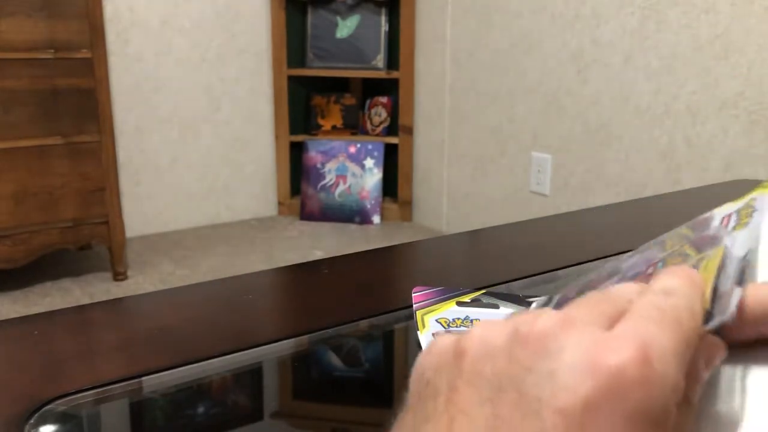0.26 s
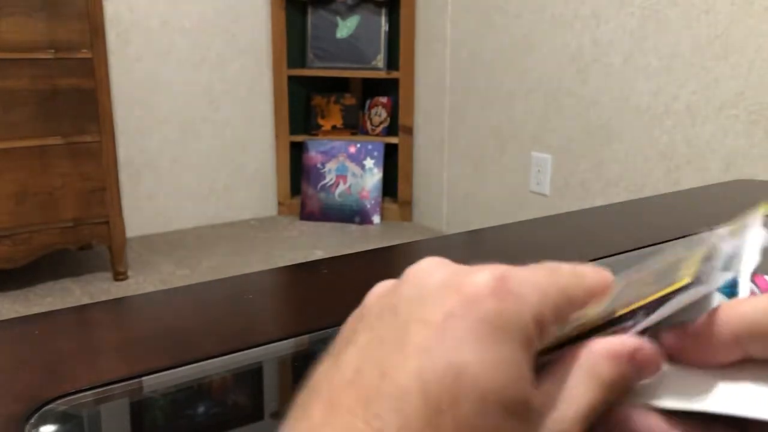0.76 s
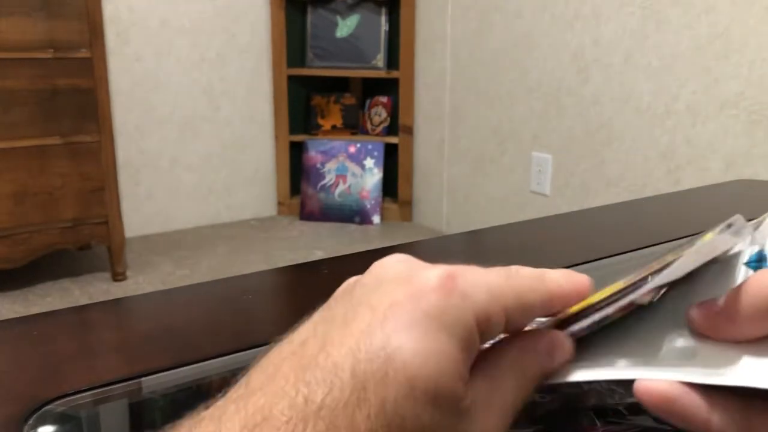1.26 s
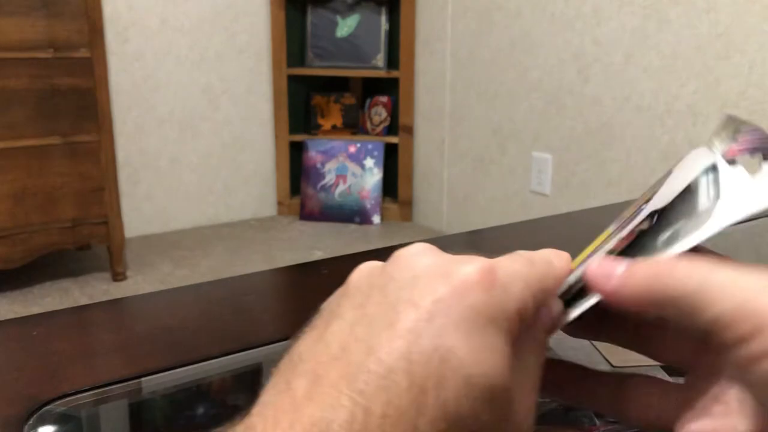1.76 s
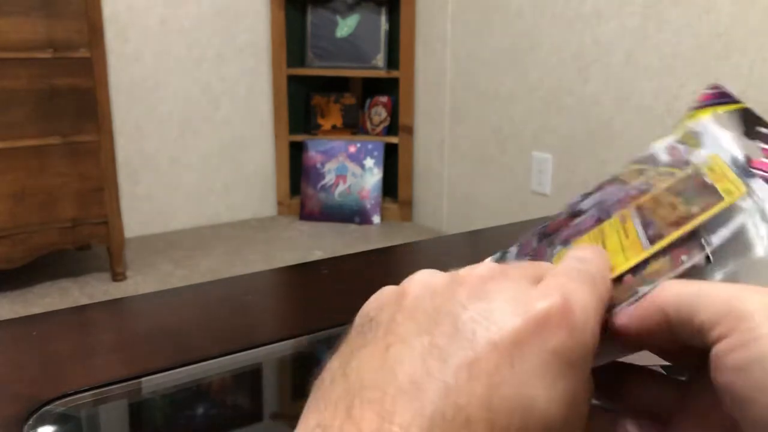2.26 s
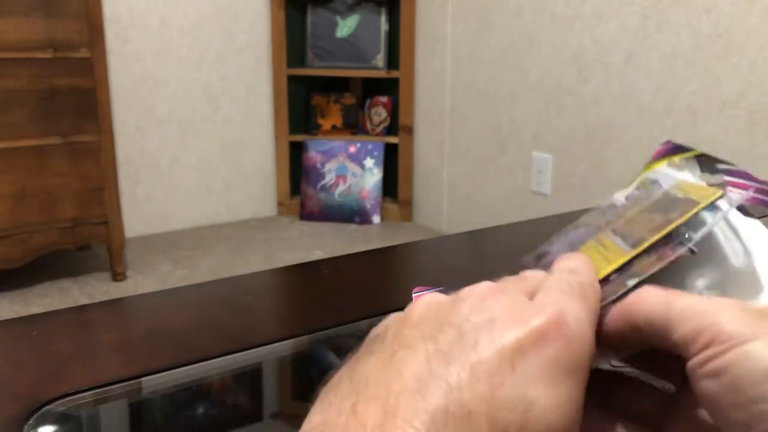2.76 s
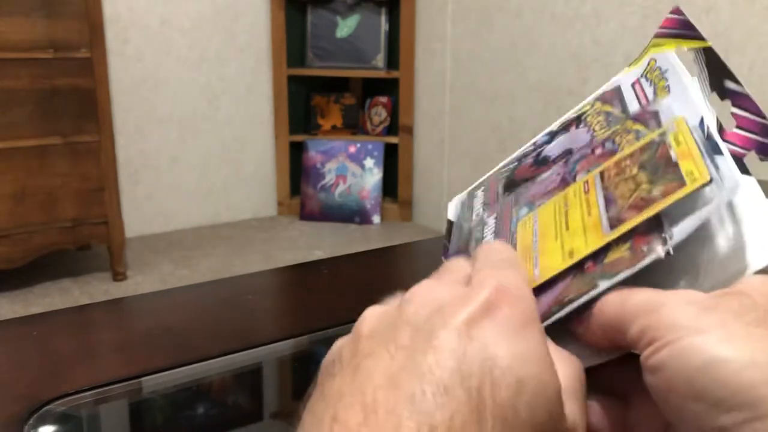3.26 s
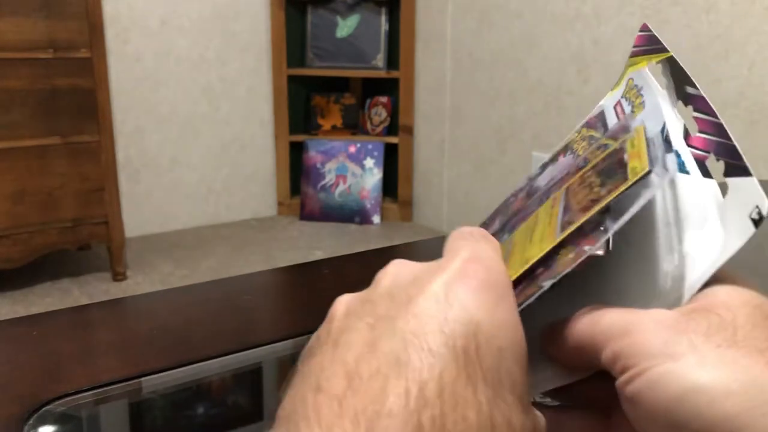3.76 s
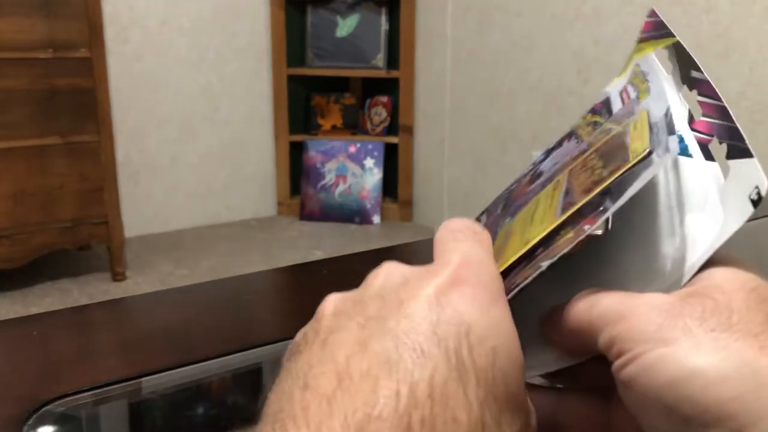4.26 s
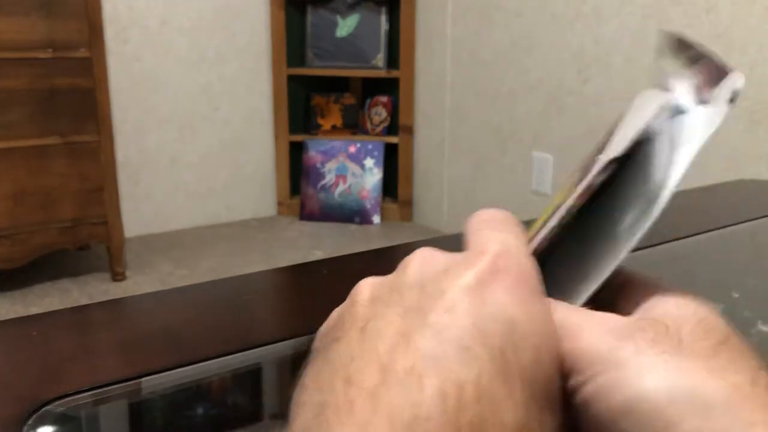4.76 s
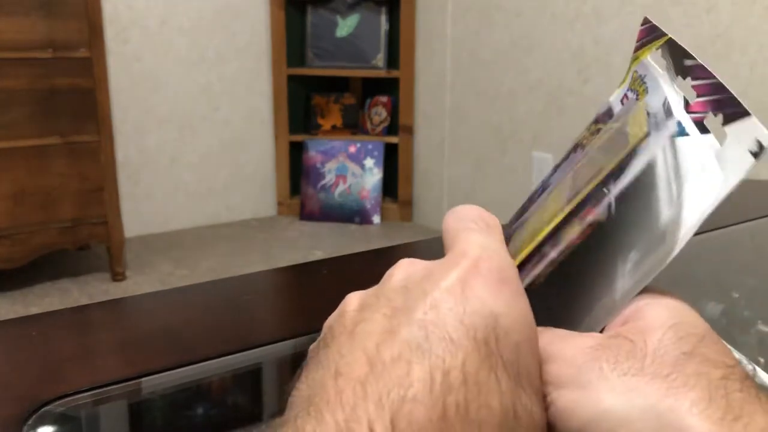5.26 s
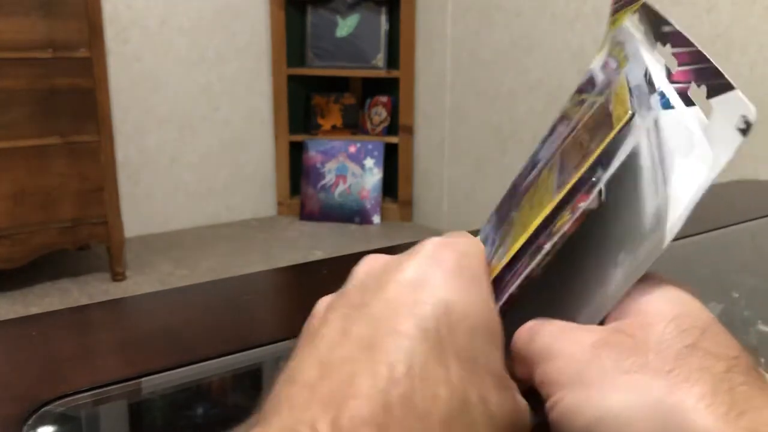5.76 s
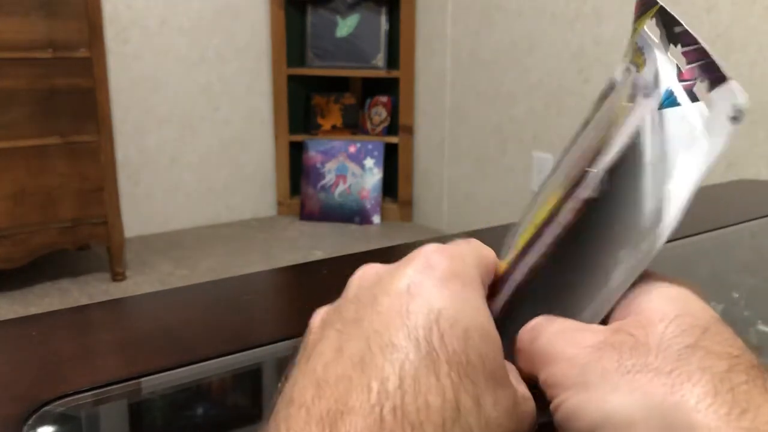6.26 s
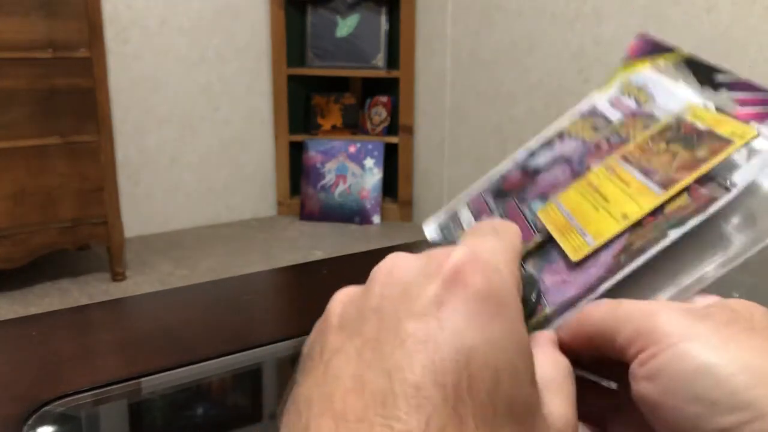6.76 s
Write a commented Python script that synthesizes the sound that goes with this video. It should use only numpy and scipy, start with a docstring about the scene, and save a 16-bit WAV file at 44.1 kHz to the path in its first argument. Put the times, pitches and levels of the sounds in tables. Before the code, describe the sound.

Close to a phone microphone in a carpeted room, hands pull stiff plastic from cardboard. Between 0.1 and 0.2 s, several loud, bright snaps ring out over a short scraping rustle. Soft strokes and dull card cracks follow; at 0.8 s a very sharp snap comes with a hollow, briefly ringing pop. From 1 to 2.5 s it is quieter: brief hissing slides, small ticks, woody cracks and near pauses. At 2.6-2.85 s the board cracks again, then a dense crackling run at 3.0-3.12 s and a dull thud near 3.17 s. From 3.2 s fizzy, uneven tearing grows longer among snaps, strongest around 4.9-5.05 s with crowded cracks. Snaps and short rips continue to about 6.4 s, with faint squeaky rubs. Tiny creaks and soft crinkling end near 7 s, over a low steady rumble.

```python
"""Two hands pull a stiff plastic blister off its cardboard backing, close to a phone in a carpeted room.
It starts with sharp shell snaps, each a burst spread by bending waves, and soon a dome pops: a ringing band.
Strokes hiss as coloured noise, some with a fizz of tiny random fibre breaks; lower cracks crowd near 3 s.
From 3.2 s the tearing is longer and stronger, among more snaps; late creaks repeat a slip.
Faint singing rubs come and go; rustling hands, reflections and a low steady rumble lie behind."""
import sys
import numpy as np
from scipy import signal
from scipy.fft import rfft, irfft, next_fast_len
from scipy.io import wavfile
from scipy.ndimage import uniform_filter1d

SR = 44100
rng = np.random.default_rng(int(sys.argv[2]) if len(sys.argv) > 2 else 0)


def dump_mix(stems):
    """Bounce the given channels to the path in sys.argv[1] as a 16-bit WAV at rate SR."""
    frames = np.atleast_2d(stems).T  # one column per channel
    limited = np.clip(frames, -1, 1)  # hard clip at full scale
    pcm = np.round(limited * 32767).astype(np.int16)
    wavfile.write(sys.argv[1], SR, pcm)


N = 308700
TIME = np.arange(N) / SR
LEAD_SAMPLES = 256  # a snap starts this long before its peak

# Levels in the tables are those of each source before it is shaped and mixed.
# Short sounds: the level is that of the same energy spread over one millisecond.
# the shell buckles: start_s, shell level_db, treble_db and board_db relative to the shell, pitch_hz
SNAPS = [(0.1118, -20.5, -20, -31, 4220), (0.1214, -20.5, -13, -15, 4500), (0.1797, -13.5, -4, -13.5, 6020),
         (0.2122, -18, -8.5, -7.5, 4320), (0.798, -21, -6, -18, 5000), (0.8054, -13, -9, -17.5, 4010),
         (1.2562, -34, -17, -7.5, 3860), (1.5809, -36, -8.5, -2.5, 3360), (2.4666, -35.5, -3, -1, 7000),
         (3.3952, -29.5, 6, -11, 3840), (3.609, -29, -3, -10, 6800), (3.9876, -31.0, -6, 0.5, 6250),
         (4.17, -28.5, 5, -5, 4000), (4.2574, -29.5, 6, -10.5, 6400), (4.321, -38, -3.5, -31, 3960),
         (4.4513, -29, -2, -9, 3950), (4.6495, -33.5, 12, -3.5, 7000), (4.679, -26.5, -15, -9, 3330),
         (4.9707, -31, 5, -7, 5870), (5.0088, -29, -2, -24, 4230), (5.0204, -26, -10, -11, 4340),
         (5.1503, -31, -6, -15, 5500), (5.3, -27, -10, -1, 4200), (5.3972, -29, -20, -3, 4240),
         (5.432, -32.5, -14, -4, 4370), (5.691, -34, -4, -2, 4280), (5.7768, -31, -15, -5, 3100),
         (5.8832, -29, -11, -8, 5200), (5.9029, -24.5, 2, -15, 3150), (5.912, -29.5, -24, -9, 4650),
         (6.0538, -29, -18, -5.5, 4800), (6.18, -29, -3, -12, 2550), (6.3725, -37.5, -7, -5, 3140),
         (6.9942, -39, -21, -7, 4870)]
# small creases flip: start_s, shell level_db
TICKS = [(1.0438, -37.5), (1.378, -39), (1.4347, -40), (1.4601, -34.5), (2.601, -38), (2.6596, -37.5),
         (2.929, -47.5), (3.783, -45), (4.093, -39.5), (4.351, -38), (4.377, -40), (4.567, -39),
         (4.808, -43.5), (5.292, -34.5), (5.411, -35.5), (5.968, -40), (6.382, -42.5)]
# the dome of the blister pops through: start_s, level_db, low and high edge of its band_hz
POP_S, POP_DB, DOME_HZ = .8057, -22, (1710, 2300)
# single strong fibres part: start_s, level_db
FIBRE_SNAPS = [(1.6226, -43), (2.298, -41), (3.419, -25), (4.0342, -34), (4.4616, -30.5), (4.8958, -30),
               (4.9295, -30), (5.576, -33), (5.6589, -35), (5.8028, -30.5), (5.957, -35.5), (6.1474, -39)]
# the cardboard cracks, dull and woody: start_s, level_db, pitch_hz
CRACKS = [(0.027, -34.5, 1550), (0.3593, -33.5, 1030), (0.4145, -42, 1600), (0.58, -45.5, 1220),
          (0.746, -42.5, 1500), (0.931, -37, 1070), (1.3486, -43.5, 1200), (1.362, -35.5, 990),
          (1.39, -50, 1150), (1.637, -32.5, 900), (2.597, -35.5, 1640), (2.6199, -32.5, 1770),
          (2.72, -43.5, 2280), (2.756, -33.5, 1800), (2.7681, -31, 1900), (2.774, -32, 1480),
          (2.8464, -31, 1190), (2.978, -36, 1320), (2.99, -39, 1100), (3.023, -33.5, 1400),
          (3.032, -37, 920), (3.055, -34, 1060), (3.0711, -33.5, 1550), (3.0874, -34, 1050),
          (3.099, -30.5, 1000), (3.107, -34, 774), (3.1235, -30.5, 2020), (3.7085, -34.5, 1290),
          (3.813, -30, 1330), (3.841, -40, 1090), (3.857, -41, 1050), (3.8896, -30.5, 1470),
          (4.023, -34, 1430), (4.4025, -32, 1840), (4.619, -36.5, 1400), (4.6394, -33.5, 1370),
          (4.937, -39, 1020), (4.949, -34, 1100), (4.9656, -31, 1010), (4.983, -32, 1640),
          (4.995, -29, 1410), (5.042, -28, 1240), (5.113, -39, 900), (5.7908, -29.5, 1470),
          (6.261, -43, 1400)]
# the whole card flexes against the hands: start_s, level_db
KNOCKS = [(2.598, -38), (2.767, -43), (2.848, -35.5), (3.168, -25.5), (3.84, -34.5), (3.89, -44.5)]
# plastic catches and slips in runs: start_s, end_s, typical slips_per_s, typical level_db of the board
CREAKS = [(5.198, 5.259, 91, -40), (6.655, 6.739, 127, -41), (6.854, 6.897, 84, -44.5)]

# Longer movements.
# strokes of plastic over card: start_s, end_s, level_db, torn_share (power from tearing fibre, 0-1)
STROKES = [(0, 0.212, -52, 0.14), (0.359, 0.508, -54.5, 0.6), (0.584, 0.956, -56, 0.08),
           (1.128, 1.3, -53, 0.27), (1.41, 1.562, -53.5, 0.27), (2.017, 2.053, -55, 0),
           (2.123, 2.227, -56, 0.75), (2.294, 2.406, -57, 0.16), (2.447, 2.5, -49.5, 0),
           (2.572, 2.67, -53, 0), (3.293, 3.366, -48, 0.09), (3.377, 3.505, -48, 0.48),
           (3.601, 3.851, -51, 0.91), (4.323, 4.493, -48.5, 0.8), (4.599, 4.718, -52.5, 0.63),
           (4.885, 5.026, -41, 0.81), (5.058, 5.315, -56.5, 0.67), (5.542, 5.67, -51, 0.65),
           (5.683, 5.728, -41.5, 0.85), (6.068, 6.114, -53.5, 0.74), (6.362, 6.405, -57, 0.54)]
# a steady pull slowly peels the glued seam: start_s, end_s
PEELS = [(3.201, 4.6), (5.2, 5.5)]
PEEL_DB, PEEL_TORN = -59.5, 0.86  # level_db and torn_share of every peel
# the grip shifts and bends the card: start_s, end_s, crackle_db, rumble_db
FLEXES = [(0, 0.155, -57, -78), (1.329, 1.45, -59, -62), (2.315, 2.356, -61, -50.5),
          (2.593, 2.643, -50.5, -48), (2.717, 2.795, -53.5, -51.5), (3.003, 3.193, -54.5, -53),
          (3.988, 4.027, -63, -52), (4.926, 5.066, -56, -56.5), (5.193, 5.329, -60.5, -56.5),
          (5.9, 5.968, -54, -65), (6.397, 6.57, -62, -80), (6.655, 6.737, -67, -51.5),
          (6.77, 6.91, -65, -59.5)]
# fingertips rub the smooth shell: start_s, end_s, voice level_db, centre pitch_hz
RUBS = [(1.785, 1.858, -64, 4510), (1.943, 2.026, -64.5, 1490), (4.12, 4.223, -59, 3860),
        (5.435, 5.518, -53.5, 4660), (6.513, 6.587, -55.5, 4410)]
# the hands lean on the desk: start_s, end_s, level_db
LEANS = [(0.355, .56, -58.5), (1.616, 1.79, -60), (4.64, 4.677, -54.5)]
# the hands are almost still: start_s, end_s
PAUSES = [(.97, 1.11), (1.68, 1.96), (4.76, 4.87)]

# board crackle under a stroke: its level_db at the usual stroke level_db, and its rise in dB per dB
DRAG_DB, USUAL_DB, DRAG_DB_PER_DB = -65.5, -50.5, 0.24
# the more of a stroke is tearing, the finer the fizz: extra top in dB per unit of share, full from FINE_HZ
FINE_HZ, FINE_DB_PER_SHARE = 13000, 14
# fibres of different lengths part at different pitches: edges of their bands, edge_hz
FIBRE_EDGES_HZ = [5000, 7000, 9000, 11500, 14000, 17000]
# resonances of the freed flap: pitch_hz at time FLAP_S, gain_db next to the direct sound
FLAP = [(5330, -2), (6300, -5), (8000, -7), (10100, 0)]
# reference time in s, sinking of the pitch per s (natural log), half width as a share of the pitch
FLAP_S, FLAP_SINK_PER_S, FLAP_WIDTH = 3.9, .062, 0.018
# resonances of the hollow blister: pitch_hz, width_hz, gain_db next to the direct sound
HOLLOW = [(1560, 400, 2.5), (4270, 5170, 3)]

# Spectra, only their shape counts: frequency_hz, relative_db
# plastic sliding on card
SLIDE_COLOUR = [(900, -16), (2000, 1), (3000, -0.5), (4300, 8.5), (6200, 1), (8000, 0.5), (13500, 1.5),
                (15500, -3.5)]
# tearing fibre at an even split of sliding and tearing
TEAR_COLOUR = [(3000, -61), (6000, 4.5), (8000, 5), (10000, 1.5), (13500, 2), (15500, 5)]
# crackling cardboard
BOARD_COLOUR = [(150, -13), (350, -4), (600, -7.5), (1000, -3.5), (1600, -10), (2600, -7.5), (6000, -14.5),
                (16000, -13.5)]
# rumble of the gripped card
GRIP_COLOUR = [(30, -44.5), (80, -3), (120, 3.5), (210, -2), (330, 3.5), (520, -4), (1200, -55)]
# weight of the hands on the desk
LEAN_COLOUR = [(25, -33), (65, -3), (110, -11.5), (300, -29.5), (1200, -84)]
# low steady rumble of the house
AIR_COLOUR = [(20, -62), (45, -16), (65, -8), (110, -10.5), (320, -15.5), (700, -19), (4500, -32),
              (16000, -37.5)]
AIR_DB = -64.5
TOP_HZ = 16100


def snaps():
    """Bright snaps of the shell, each pinging at its own pitch; each begins a little before its peak."""
    out = np.zeros(N)
    for s, db, treble_db, board_db, hz in SNAPS:
        add(out, s - LEAD_SAMPLES / SR, undb(db) * snap(board_db, treble_db, hz))
    return out


def snap(board_db, treble_db, hz, ping_db=0, ping_t60=0.006, thud_db=-14,
         lead_db=-15, lead_s=0.00016, give_db=-20, give_s=.004, size=LEAD_SAMPLES):
    """A crease starts to give, then cracks, pings a patch of the shell and, lower and later, the board."""
    burst = band(release(t60=0.0096, scatter=0.99), 3210, 6500)
    shell = unit(bend(burst, lag_s=0.000362))
    t = TIME[:len(shell)]
    ping = np.sin(2 * np.pi * hz * t) * undb(-60 * t / ping_t60)
    ping = band(ping, hz / 1.5, hz * 1.5)
    shell = unit(shell + undb(ping_db) * unit(ping))
    crack = unit(band(release(t60=0.0044, scatter=14.0), 6460, 14200, order=3))
    wave = bend(release(t60=0.026, scatter=0.78), lag_s=0.00102)
    board = unit(band(wave, 797, 2610)) + undb(thud_db) * unit(band(wave, 393, 610))
    # a first small give, then smaller breaks crowd in just before the main one
    lead = rng.standard_normal(size) * np.exp(-TIME[:size][::-1] / lead_s)
    lead *= undb(lead_db) / np.linalg.norm(lead)
    lead[-min(int(give_s * SR), size)] += undb(give_db)
    lead[-1] = 1
    late_crack = np.pad(crack, (size - 1, 0))  # the treble waits for the main break
    return signal.fftconvolve(shell + undb(board_db) * board, lead) + undb(treble_db) * late_crack


def ticks(board_db=-4, treble_db=-5, pitch_hz=4500):
    """Small creases flip like weak snaps."""
    out = np.zeros(N)
    for s, db in TICKS:
        add(out, s - LEAD_SAMPLES / SR, undb(db) * snap(board_db, treble_db, pitch_hz))
    return out


def pop():
    """The dome flips over with a sharp ping and rattles on briefly."""
    out = np.zeros(N)
    ring = band(release(t60=0.19, scatter=0.26, size=8192), *DOME_HZ, order=3)
    add(out, POP_S, undb(POP_DB) * unit(ring))
    return out


def friction():
    """Sliding hisses, parting fibres fizz and the strained board crackles, all in small fits and starts."""
    breaks = grains(rate=700, spread_db=7)
    # small creases flip one by one and sound in shell and board together
    crinkles = bend(grains(rate=170, spread_db=2.8), lag_s=.001)
    fits = undb(3 * walk(110) + 1.3 * walk(25))
    hiss, fizz, rasp = rng.standard_normal((3, N))
    pings = fibres()
    bending = sum(undb(db) * swell(TIME, a, b) for a, b, db, _ in FLEXES)
    dull = band(crinkles, 300, 3500, order=1)
    out = bending * fits * colour(rasp + 1.9 * dull, BOARD_COLOUR)
    peels = [(a, b, PEEL_DB, PEEL_TORN) for a, b in PEELS]
    for start, end, db, torn in STROKES + peels:
        # work on a short stretch of time around the stroke
        first = max(int((start - .06) * SR), 0)
        length = next_fast_len(int((end - start + .14) * SR), True)
        t = first / SR + TIME[:length]
        span = (first + np.arange(len(t))) % N

        torn = np.clip(torn, .002, .98)
        slide_db, tear_db = db + 10 * np.log10([1 - torn, torn])
        board_db = DRAG_DB + DRAG_DB_PER_DB * (db - USUAL_DB)
        # breaking fibres stand out of the hiss only while the card really tears
        tearing = 1.6 / (1 + np.exp(-(tear_db + 56) / 4))
        # the strained board crinkles faintly as it tears
        strain = .2 * tearing * crinkles[span]

        sliding = hiss[span] + tearing * breaks[span] + strain
        slide = undb(slide_db - 1.5) * colour(sliding, SLIDE_COLOUR)

        finer_db = FINE_DB_PER_SHARE * (torn - .5)
        fibre_colour = [(hz, level + finer_db * min(hz / FINE_HZ, 1) ** 4) for hz, level in TEAR_COLOUR]
        parting = fizz[span] + tearing * (breaks[span] + pings[span]) + strain
        tear = undb(tear_db) * flap(colour(parting, fibre_colour), (start + end) / 2)

        # reading the noise backwards keeps this crackle apart from the bending crackle
        board = undb(board_db) * colour(rasp[span[::-1]] + 2 * strain, BOARD_COLOUR)

        unsteady = fits[span] ** (.5 + torn)  # tearing is more uneven than sliding
        stroke = (slide + tear + board) * unsteady * swell(t, start, end) * arch(t, start, end)
        sheet = release(t60=.006, scatter=.4, size=512)
        add(out, first / SR, signal.fftconvolve(stroke, sheet / np.linalg.norm(sheet)))
    return out


def fibres(rate=260, spread_db=5.5, flutter_db=3, flutter_rate=70):
    """Each parting fibre gives a tiny ping in its own part of the treble, and they go in bunches; rms 1."""
    x = np.zeros(N)
    for low, high in zip(FIBRE_EDGES_HZ, FIBRE_EDGES_HZ[1:]):
        x += band(grains(rate, spread_db), low, high) * undb(flutter_db * walk(flutter_rate))
    return x / np.std(x)


def flap(x, s):
    """The freed flap rings to the fibres, lower as the tear makes it longer by time s; rms 1."""
    shift = np.exp(-FLAP_SINK_PER_S * max(s - FLAP_S, -.5))
    y = x.copy()
    for hz, db in FLAP:
        pitch = hz * shift
        y += undb(db) * band(x, pitch * (1 - FLAP_WIDTH), pitch * (1 + FLAP_WIDTH), order=1)
    return y / np.std(y)


def fibre_snaps():
    """A strong fibre lets go with a thin tick, all treble."""
    out = np.zeros(N)
    for s, db in FIBRE_SNAPS:
        add(out, s, undb(db) * unit(band(release(t60=0.013, scatter=0.53), 3100, 14000)))
    return out


def cracks(spread=1.41, thud_db=-11, edge_db=-7, edge_hz=1400):
    """The board gives at its own pitch, with a sharp edge before, stronger in high cracks, and a late thud."""
    out = np.zeros(N)
    for s, db, hz in CRACKS:
        wave = bend(release(t60=0.013, scatter=1.0), lag_s=0.00104)
        body = unit(band(wave, hz / spread, hz * spread))
        thud = unit(band(wave, 257, 510))
        edge = unit(band(bend(release(t60=0.017, scatter=1), lag_s=0.000428), 3500, 8650))
        edge_gain = undb(edge_db) * hz / edge_hz
        add(out, s, undb(db) * unit(body + undb(thud_db) * thud + edge_gain * edge))
    return out


def knocks():
    """Slow bending waves of the whole card: a short falling thud."""
    out = np.zeros(N)
    for s, db in KNOCKS:
        wave = bend(release(t60=0.032, scatter=1.0, size=4096), lag_s=0.00147)
        add(out, s, undb(db) * unit(band(wave, 135, 430)))
    return out


def creaks(board_hz=1350, shell_hz=4400, shell_db=-2):
    """Plastic catches and slips on the card in runs; each slip rings the shell, and the board at a new pitch."""
    pulses = np.zeros(N)
    for start, end, rate, db in CREAKS:
        s = start
        for gap, strength, pitch in rng.standard_normal((16, 3)):
            hz = board_hz * np.exp(.15 * pitch)
            slip = release(t60=.014, scatter=.7)
            if s < end:
                board = unit(band(slip, hz / 1.5, hz * 1.5))
                shell = unit(band(slip, shell_hz / 1.3, shell_hz * 1.3))
                add(pulses, s, undb(db + 1.5 * strength) * (board + undb(shell_db) * shell))
            s += np.exp(.14 * gap) / rate  # uneven wait for the next slip
    return bend(pulses, lag_s=0.00106)


def rubs(width_hz=400, glide=-0.058, waver=0.013, skirt_db=-3):
    """Smooth rubbing sings in a narrow, wavering band that sinks as the free length of sheet grows."""
    out = np.zeros(N)
    drift = 1 + waver * walk(25)
    hiss = rng.standard_normal(N)
    flutter = band(rng.standard_normal(N), 5, width_hz / 2, order=1)
    for start, end, db, hz in RUBS:
        along = np.clip((TIME - start) / (end - start), 0, 1) - .5
        pitch = hz * drift * (1 + glide * along)
        voice = flutter * np.sin(2 * np.pi * np.cumsum(pitch) / SR)
        skirt = band(hiss, hz * .4, hz * 1.15, order=3)  # broad noise, mostly below the voice
        rub = voice / np.std(voice) + undb(skirt_db) * skirt / np.std(skirt)
        out += undb(db) * swell(TIME, start, end) * arch(TIME, start, end) * rub
    return out


def handling(rustle_db=-70, board_db=-69, pad_db=-69):
    """Restless fingers on the pack: a faint rustle, rumbles of the card and the weight of the hands."""
    still = sum(swell(TIME, a, b) for a, b in PAUSES)
    restless = undb(2.2 * walk(14)) * (1 - .85 * still)
    catches = grains(rate=400, spread_db=8)
    rustle = undb(rustle_db) * colour(rng.standard_normal(N) + 2 * catches, SLIDE_COLOUR)
    crinkles = bend(grains(rate=40, spread_db=3), lag_s=.001)
    board = undb(board_db) * colour(rng.standard_normal(N) + 0.5 * crinkles, BOARD_COLOUR)
    grip = undb(pad_db) * restless + sum(undb(db) * swell(TIME, a, b) for a, b, _, db in FLEXES)
    card = colour(rng.standard_normal(N) + 1.4 * grains(rate=140, spread_db=7.5), GRIP_COLOUR)
    lean = sum(undb(db) * swell(TIME, a, b) for a, b, db in LEANS)
    weight = colour(rng.standard_normal(N), LEAN_COLOUR)
    return restless * (rustle + board) + grip * card + lean * weight


def hollow(x, direct_db=-2):
    """The air and walls of the blister pick out a few broad bands."""
    y = x.copy()
    for hz, width, db in HOLLOW:
        y += undb(db) * band(x, hz - width / 2, hz + width / 2, order=1)
    return undb(direct_db) * y


def room(x, t60=0.35, wet_db=-13.0, gap_s=.008, dull_hz=7000):
    """The answer of walls and furniture: after a short gap, with less treble."""
    t = TIME[:SR // 2]
    tail = rng.standard_normal(len(t)) * undb(-60 * t / t60) * (t > gap_s)
    tail = band(tail, 99, dull_hz, order=1)
    return undb(wet_db) * signal.fftconvolve(x, tail / np.linalg.norm(tail))[:N]


def house():
    """A low steady rumble: noise given a mostly deep spectrum."""
    return undb(AIR_DB) * colour(rng.standard_normal(N), AIR_COLOUR)


def release(t60, scatter, size=2048):
    """A sudden release, then edge reflections of the sheet that fade by 60 dB in t60 seconds."""
    echoes = rng.standard_normal(size) * undb(-60 * np.arange(size) / SR / t60)
    x = scatter * echoes / np.linalg.norm(echoes)
    x[0] += 1
    return x


def bend(x, lag_s):
    """Bending waves speed up as the root of frequency, so treble comes first; lag_s is the delay at 1 kHz."""
    f = np.fft.rfftfreq(2 * len(x), 1 / SR)
    delay = np.exp(-4j * np.pi * lag_s * np.sqrt(1000 * f))
    return irfft(rfft(x, 2 * len(x)) * delay)[:len(x)]


def grains(rate, spread_db):
    """Tiny breaks at random moments (rate per s), a few much stronger than the rest; rms 1."""
    happens = rng.random(N) < rate / SR
    strength = rng.exponential(size=N)
    sign = rng.choice([-1, 1], N)
    x = happens * sign * undb(spread_db * np.minimum(strength, 3))
    return x / np.std(x)


def walk(rate):
    """A slow random wander, about rate new values per second, with a spread of 1."""
    k = max(int(SR / rate), 2)
    steps = np.repeat(rng.standard_normal(N // k + 1), k)[:N]
    y = uniform_filter1d(steps, k)
    return y / np.std(y)


def swell(t, start, end):
    """One movement of the fingers: it sets in, holds and dies away."""
    rise_s, fall_s = .007, .009
    rise = 1 + np.tanh((t - start) / (2 * rise_s))
    fall = 1 + np.tanh((end - t) / (2 * fall_s))
    return rise * fall / 4


def arch(t, start, end, sag_db=5):
    """A stroke is fastest, and so loudest, halfway through."""
    along = np.clip(2 * (t - start) / (end - start) - 1, -1, 1)
    return undb(sag_db * (1 / 3 - along ** 2))


def colour(x, points):
    """Give a sound a spectrum and an rms of 1."""
    hz, db = np.transpose(points)
    f = np.maximum(np.fft.rfftfreq(len(x), 1 / SR), 1)
    gain = undb(np.interp(np.log(f), np.log(hz), db))
    y = irfft(rfft(x) * gain, len(x))
    return y / np.std(y)


def band(x, low_hz, high_hz, order=2):
    """Keep mainly the sound between two frequencies, with a filter that never looks ahead."""
    edges = [low_hz, min(high_hz, SR / 2 - 1)]
    return signal.sosfilt(signal.butter(order, edges, "band", fs=SR, output="sos"), x)


def undb(db):
    """Decibels to gain."""
    return 10 ** (np.asarray(db) / 20)


def unit(x):
    """Scale to the energy of one millisecond at full level."""
    return x * np.sqrt(SR / 1000 / np.sum(x ** 2))


def add(out, s, x):
    """Mix a short sound in at time s."""
    i = int(np.clip(round(s * SR), 0, N - 1))
    out[i:i + len(x)] += x[:N - i]


def scene(spill_db=-5):
    """The pack in the room; the shell faces the phone, so its snaps spill less into the room."""
    shell = snaps() + fibre_snaps() + ticks()
    rubbing = hollow(friction() + handling())
    card = cracks() + pop() + knocks() + creaks() + rubs() + rubbing
    return (shell + card + room(card + undb(spill_db) * shell) + house())[None]


def record(dry, bass_hz=45):
    """The phone's microphone loses the deep bass, and the top is cut."""
    sound = signal.sosfilt(signal.butter(3, bass_hz, "high", fs=SR, output="sos"), dry)
    return signal.sosfilt(signal.ellip(10, .2, 70, TOP_HZ, fs=SR, output="sos"), sound)


dry = scene()
out = record(dry)
dump_mix(out)
```